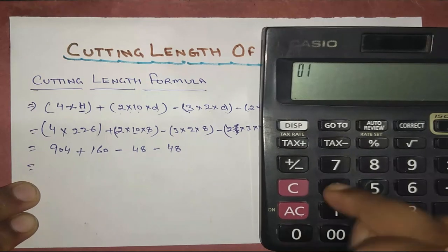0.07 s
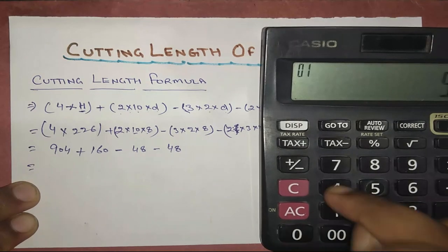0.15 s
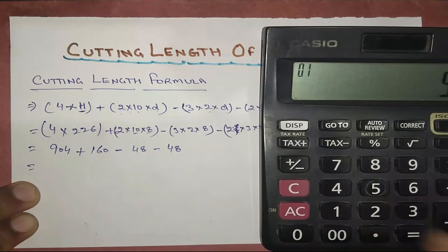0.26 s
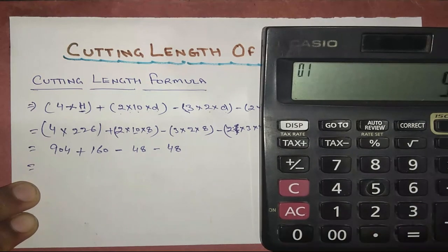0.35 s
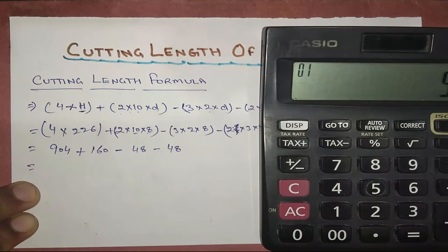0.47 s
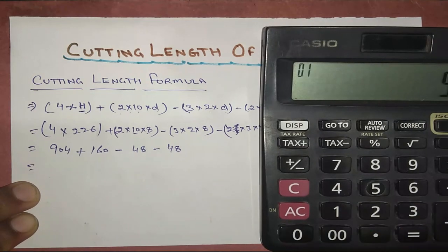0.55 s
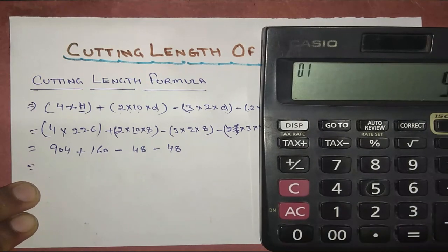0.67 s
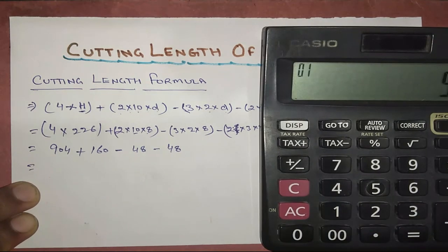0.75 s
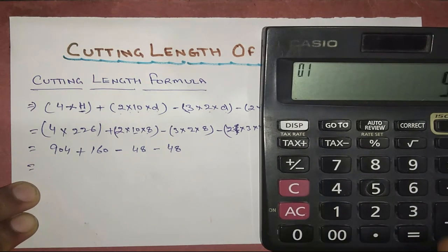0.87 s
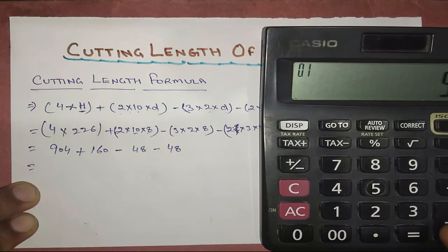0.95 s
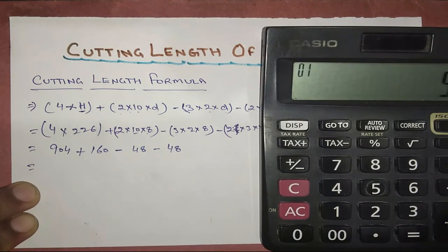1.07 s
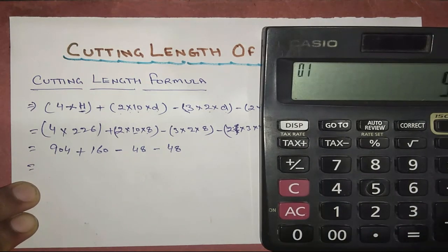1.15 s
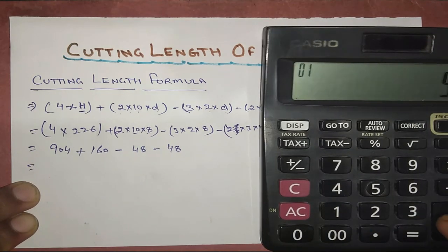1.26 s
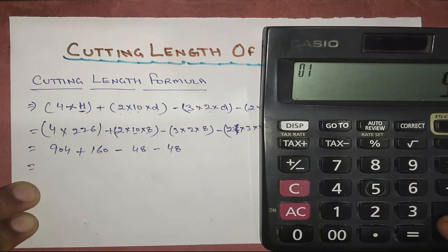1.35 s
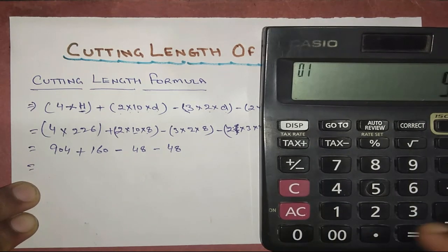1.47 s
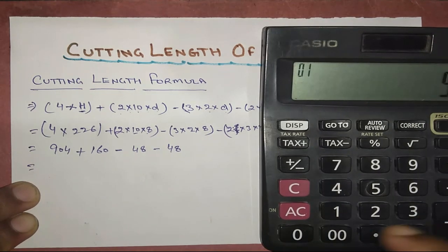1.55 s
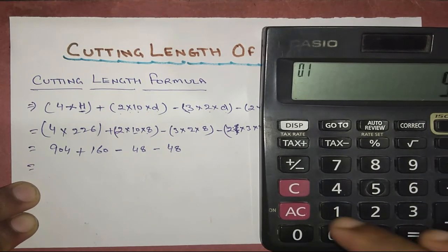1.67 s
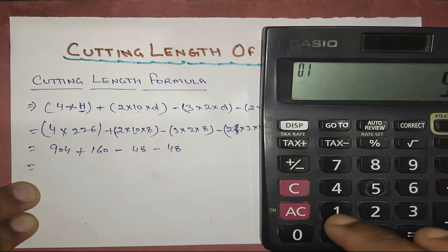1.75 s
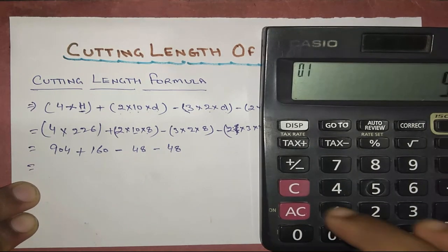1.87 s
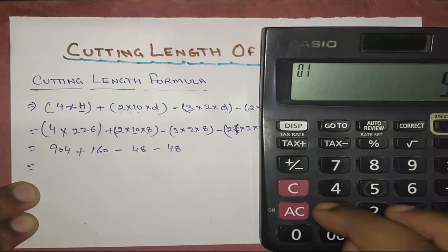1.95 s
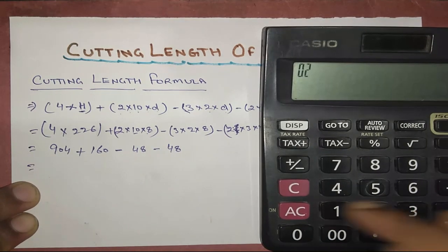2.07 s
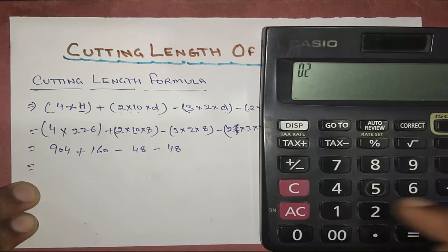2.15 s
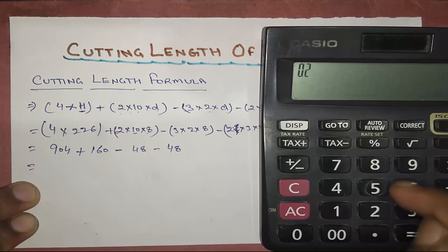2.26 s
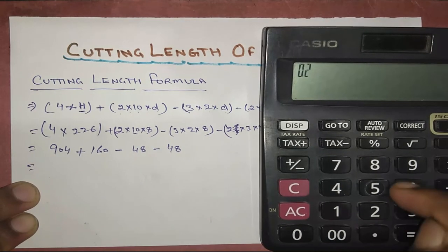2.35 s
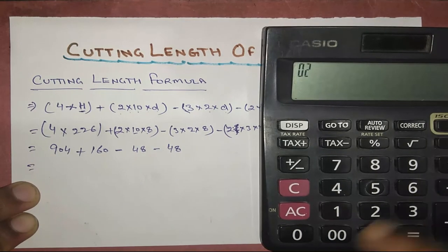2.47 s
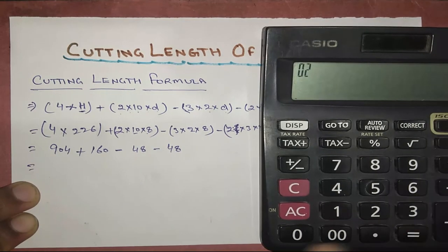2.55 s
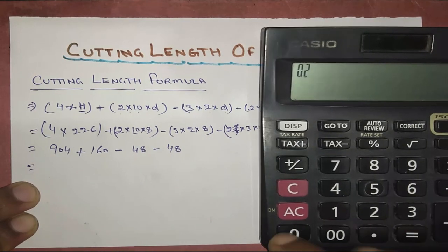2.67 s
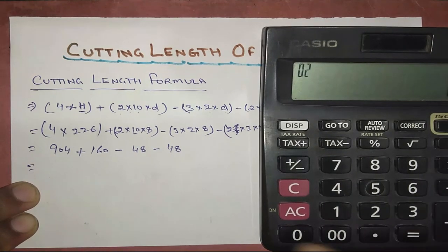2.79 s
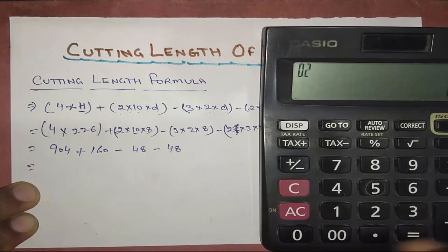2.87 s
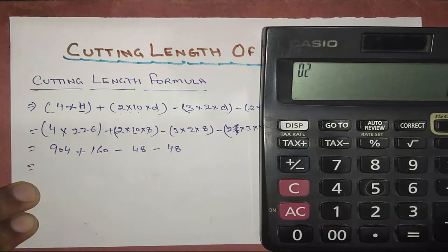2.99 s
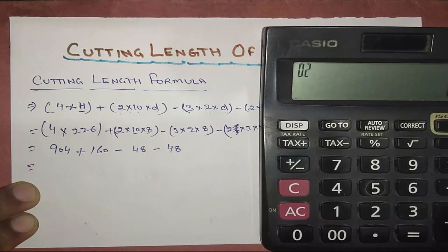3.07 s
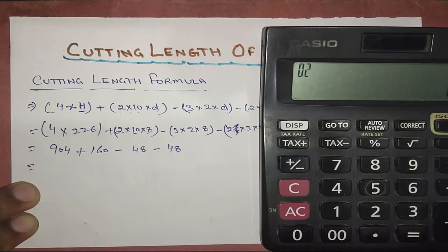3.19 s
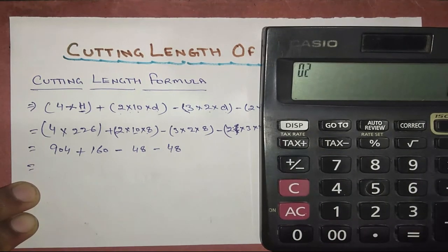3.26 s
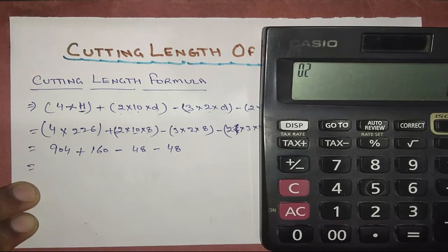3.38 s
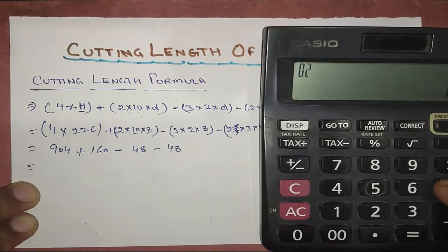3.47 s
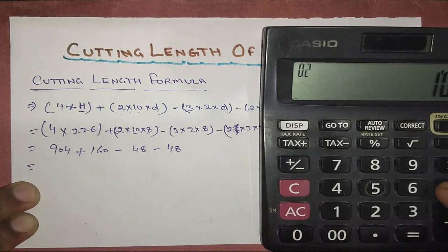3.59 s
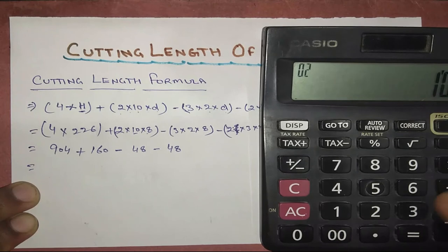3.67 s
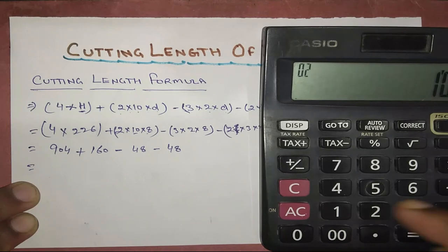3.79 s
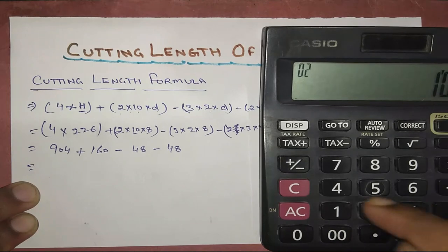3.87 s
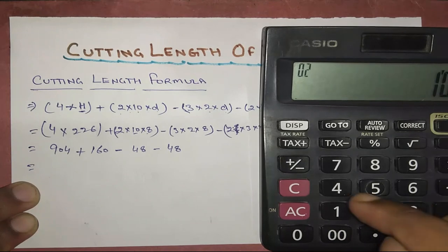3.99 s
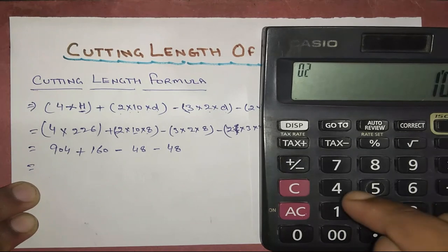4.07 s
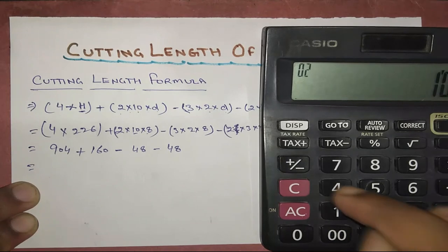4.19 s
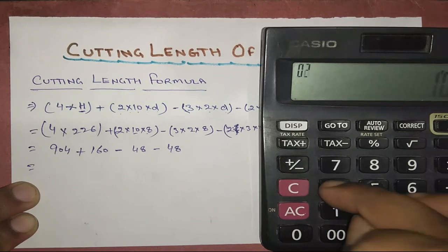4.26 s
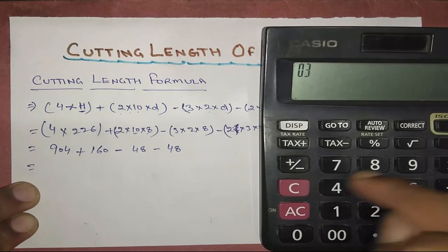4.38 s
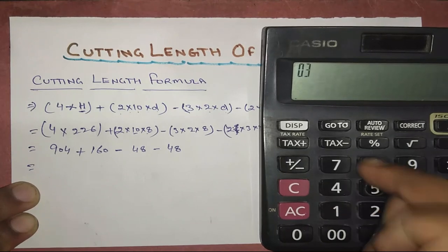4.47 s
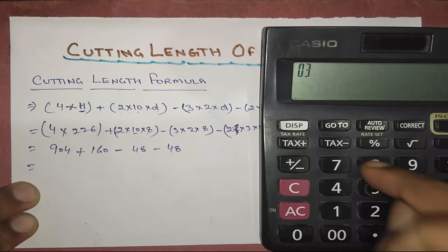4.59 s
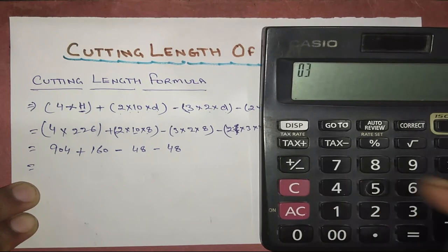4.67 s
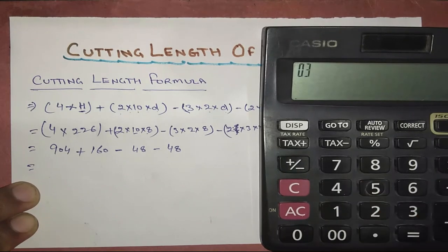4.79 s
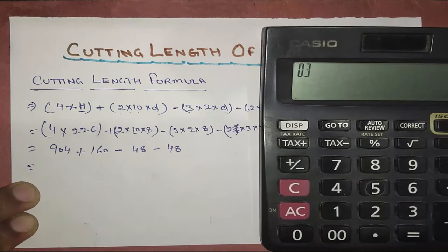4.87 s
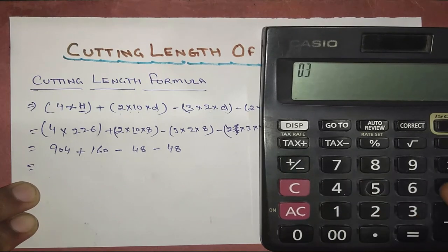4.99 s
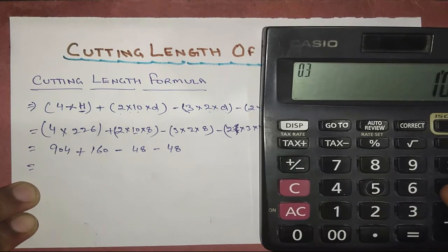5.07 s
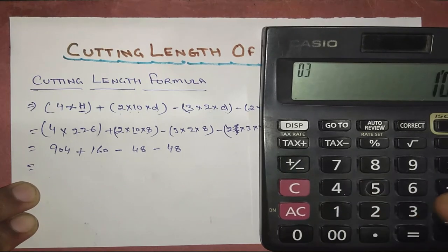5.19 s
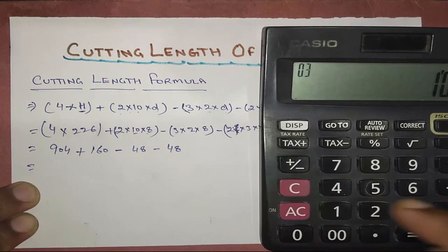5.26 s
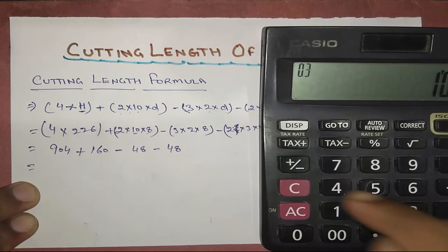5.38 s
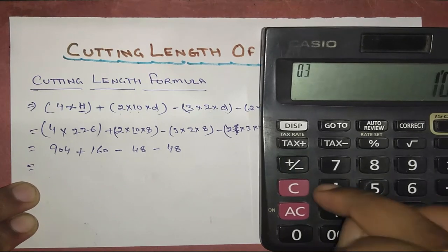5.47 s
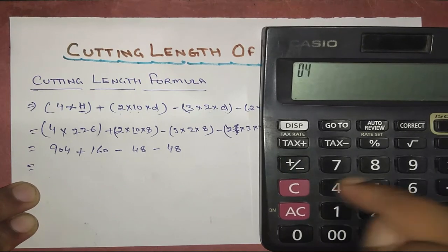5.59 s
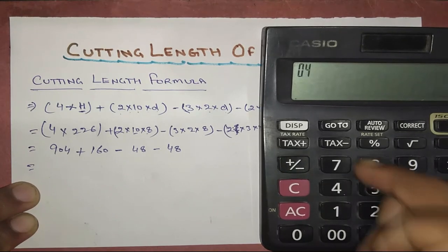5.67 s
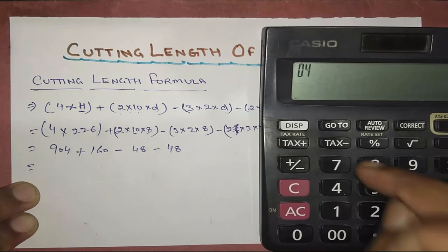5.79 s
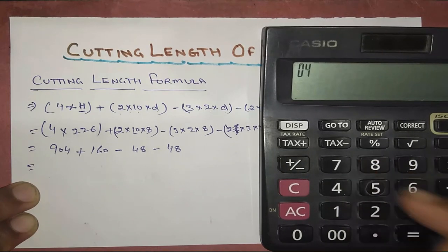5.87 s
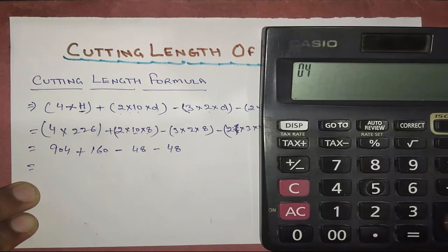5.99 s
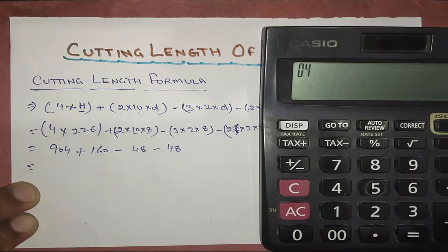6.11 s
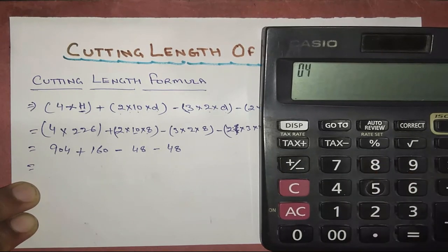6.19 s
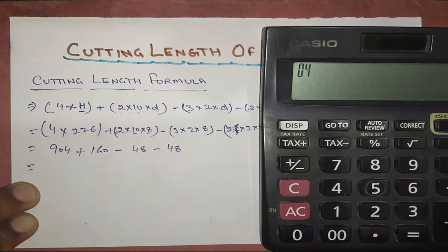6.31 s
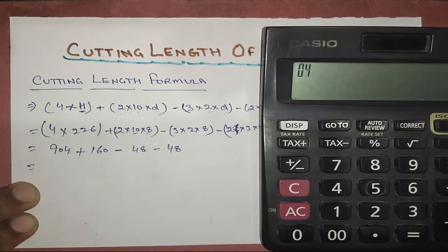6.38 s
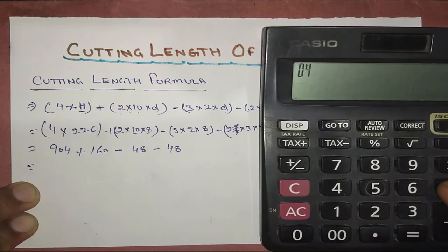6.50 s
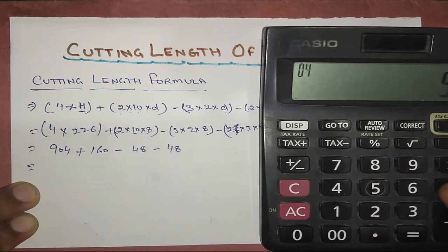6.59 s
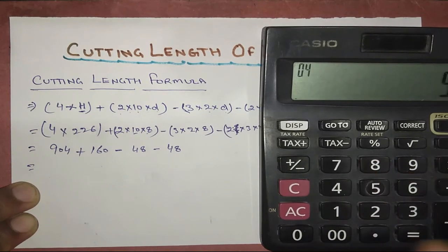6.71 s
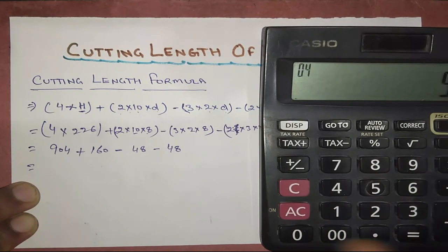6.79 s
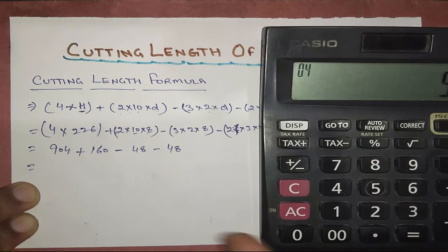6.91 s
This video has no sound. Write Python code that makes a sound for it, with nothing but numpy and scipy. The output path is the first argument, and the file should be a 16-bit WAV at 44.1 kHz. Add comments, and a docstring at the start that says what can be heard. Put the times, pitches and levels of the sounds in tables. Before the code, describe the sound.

The plastic keys of a desk calculator are pressed about a dozen times at an uneven pace. Each press gives a sharp, slightly hollow clack with a soft thud through the desk, followed at once by a second click as the key springs back. The microphone is close, in a small quiet room with a short echo. Faint engines and a low street rumble come through the walls, swelling and fading.

```python
"""Desk calculator in a small quiet room

Plastic keys are pressed and let go close to a phone's microphone. Each stroke is a cluster of contacts
that ring the case, and a press also thuds through the desk. Engines and street noise come through the
walls. The phone's noise suppressor shuts on the fading room tail."""
import sys
import numpy as np
from scipy import signal
from scipy.fft import rfft, irfft, next_fast_len
from scipy.io import wavfile
from scipy.ndimage import uniform_filter1d

SR = 44100
rng = np.random.default_rng(int(sys.argv[2]) if len(sys.argv) > 2 else 0)


def unload_wav(signal):
    """Save mono or channel-first audio to the path in sys.argv[1] as 16-bit WAV at rate SR, clipped to [-1, 1]."""
    wavfile.write(
        sys.argv[1],
        SR,
        np.round(np.clip(np.atleast_2d(signal).T, -1, 1) * 32767).astype(np.int16),
    )


N = 306039

# A key landing on its pad. Each row: time in seconds, rough peak in dB, low and high mode gains in dB,
# rattle decay in ms, lead of the finger's touch in ms, touch in dB, bounce spacing in ms, first bounce
# in dB, desk thud in dB.
PRESSES = [(0.1193, -5.5, -1, 3, 2.2, 3, -27, 5.2, -10, -21),
           (1.314, -2, -5, -15, 1, 2.5, -15, 5, -32, -32.5),
           (1.9633, -17.5, -2, -1, 1.2, 3.7, -26, 3.9, -16, -26),
           (2.326, -13.5, -1, -3, 6.3, 5.5, -19.5, 8.5, -15.5, -23),
           (2.678, -8, 0.5, 2.5, 1.9, 3.1, -31.5, 5.8, -13.5, -23.5),
           (3.4935, -6, -3, -2, 3, 2.6, -18.5, 5.8, -11, -20),
           (4.2706, -11, -5, -2.5, 1.1, 4.76, -16.5, 5.8, -31, -23.5),
           (4.5241, -9.5, -5.5, -5.5, .5, 5.6, -18.5, 5, -27.5, -25),
           (5.0146, -6.5, 0.5, -1.5, 2.4, 3.8, -19, 5.4, -10.5, -23.5),
           (5.4839, -10, -3, -1.5, 1.8, 3, -33, 12, -24, -30.5),
           (5.7249, -17.5, 2, 0, 1.6, 4.9, -21, 5, -32.5, -29),
           (6.572, -10, -0.5, -3.5, 1.3, 3, -33, 5, -11.5, -26.5)]


def contacts():
    """A press is a touch, a landing and three dying bounces; a release is pad, stop and cap edge."""
    # A key springing back to its stop. Each row: five columns as in PRESSES, lead of the pad letting go
    # in ms, its level in dB, lag of the cap's other edge in ms (minus is earlier), its level in dB.
    releases = [(0.2133, -14, -2.5, -2.5, 0.88, 18.7, -19.5, -20.5, -27),
                (1.4261, -15.5, 0.5, -3, .7, 8.5, -21.5, 9, -18.5),
                (2.0722, -15.5, -5.5, 0, 0.91, 18, -35, 10, -14.5),
                (2.4266, -9, -1, -3.5, 0.69, 18.8, -26.5, 7, -20),
                (2.775, -9, -2, 0, 1, 14.7, -26, 7.5, -15.5),
                (3.6266, -4.5, -4.5, -2, 1.6, 24, -20, -11.8, -16.5),
                (4.3669, -9.5, -3.5, 0, 1.1, 18.5, -27, -3.5, -16.5),
                (4.6263, -13, -2, -1, 1.4, 19.8, -18, 4.5, -34),
                (5.138, -1, -2.5, 6.5, 0.97, 23, -24.5, -6, -18.5),
                (5.5741, -13, -2.5, 2.5, .7, 19, -28, -6, -18.5),
                (5.825, -9, -3.5, 2.5, 1.16, 18.2, -25.5, -15, -32),
                (6.6647, -8, -3.5, -3, 3, 19, -18, 3.5, -15)]
    # Faint ticks, some alone, some just before a key springs back. Each row: four columns as in PRESSES.
    ticks = [(0.5886, -33, -18, -5.5), (0.6138, -38, -10, 2), (0.931, -34, -6, -1), (1.4913, -27.5, 9, -5),
             (2.7511, -27.5, -12, -4), (5.798, -33, 7.5, -5)]
    light_ms = 1.4  # rattle of a light contact
    hollow_db, bounce_low_db = 8, 1.5  # lift of the low modes
    rows = [(*tick, light_ms) for tick in ticks]
    for s, db, low, high, rattle_ms, touch_ms, touch_db, gap_ms, bounce_db, _ in PRESSES:
        rows.append((s - touch_ms / 1000, touch_db, low + hollow_db, high, light_ms))
        rows.append((s, db, low, high, rattle_ms))
        for k, jitter in enumerate(.06 * rng.standard_normal(3)):
            lag = gap_ms / 1000 * (k + 1 + k * jitter)
            rows.append((s + lag, bounce_db - 6 * k, low + bounce_low_db, high, light_ms))
    for s, db, low, high, rattle_ms, pad_ms, pad_db, edge_ms, edge_db in releases:
        rows += [(s - pad_ms / 1000, pad_db, low + hollow_db, high, light_ms),
                 (s, db, low, high, rattle_ms),
                 (s + edge_ms / 1000, edge_db, low + bounce_low_db, high, light_ms)]
    return rows


def keys():
    """Each contact slides, snaps and rattles, ringing the case: the close sound and the room's feed."""
    # Modes of the plastic case. Each row: pitch in Hz, width in Hz before broadening, level in dB.
    case_modes = [(490, 540, -10), (843, 440, -3), (1130, 150, -7), (1630, 420, -2.5), (1707, 190, -0.5),
                  (1982, 440, -2.5), (2940, 380, -3.5), (3374, 390, -1.5), (3840, 220, -2.5),
                  (4550, 280, -3.5), (5460, 350, -2.5), (6487, 420, -2), (6920, 510, -4), (6860, 560, 0),
                  (7710, 300, -5.5), (8900, 400, -13.5)]
    hz, width, mode_db = np.transpose(case_modes)
    near, around, t = np.zeros(N), np.zeros(N), np.arange(1280) / SR
    lead = 256  # samples ahead of the snap
    since, bins = t - lead / SR, np.fft.rfftfreq(lead, 1 / SR)
    decay = np.exp(-np.pi * 1.4 * np.outer(width, t))
    # the key stem scrapes in its guide just before it lands
    slide = undb(-19.5) * np.exp(np.minimum(since, 0) / 0.0021) * (since < 0)
    thin = signal.butter(4, 420, "high", fs=SR, output="sos")  # a small case radiates no bass
    # summed over all directions the mode weights even out into a smooth colour
    colour_db = along([(250, -41), *zip(hz, mode_db)], bins)
    for s, peak_db, low_db, high_db, rattle_ms in contacts():
        tilt = [(1800, low_db), (2800, 0), (4600, 0.012), (5600, high_db)]
        detune, scatter = rng.standard_normal((2, len(hz)))
        ring = decay * np.sin(2 * np.pi * np.outer(hz * (1 + detune / 25), t))
        weights = undb(mode_db + along(tilt, hz) + 1.8 * scatter) * (-1) ** np.arange(len(hz))
        rattle = np.exp(-np.maximum(since, 0) * 1000 / rattle_ms) * (since >= 0)
        push = rng.standard_normal(len(t)) * (slide + rattle)
        push[lead] += 3.0  # the snap
        hit = signal.sosfilt(thin, signal.fftconvolve(push, weights @ ring)[:len(t)])
        rough_peak = 2 * np.sqrt(np.max(uniform_filter1d(hit ** 2, size=90)))
        hit *= undb(peak_db) / rough_peak
        add(near, s - lead / SR, hit)
        even = np.fft.fftshift(irfft(undb(colour_db + along(tilt, bins))))
        add(around, s, even * np.linalg.norm(hit) / np.linalg.norm(even))
    return near, around


def thuds():
    """The soft push of a finger swells and fades in two desk modes that beat; the case knocks once."""
    # Desk modes, swinging against each other. Each row: pitch in Hz, level in dB.
    desk_modes = [(98.8, -3.5), (68.67, -5)]
    # The case knocking on the desk: pitch in Hz, t60 in seconds, level in dB against the thud.
    case_knock = (430, .05, -13)
    knock_hz, t60, knock_db = case_knock
    swell_s, lag_s = 0.024, .004
    out, t = np.zeros(N), np.arange(SR // 4) / SR
    swell = t / swell_s * np.exp(1 - t / swell_s)
    ring = sum((-1) ** k * undb(db) * np.sin(2 * np.pi * hz * t) for k, (hz, db) in enumerate(desk_modes))
    for s, *_, db in PRESSES:
        hz = knock_hz * (1 + 0.028 * rng.standard_normal())
        knock = np.sin(2 * np.pi * hz * t) * 1000 ** (-t / t60)
        add(out, s + lag_s, undb(db) * (swell * ring + undb(knock_db) * knock))
    return out


def room(x):
    """Dense early clatter from desk and case, then a tail that decays band by band."""
    # Decay of the small room. Each row: frequency in Hz, t60 in seconds.
    decay_times = [(300, 0.46), (1000, 0.49), (3000, 0.29), (8000, 0.33)]
    tail_db, early_db, early_s = -15.5, -12, 0.0084
    t, tail = np.arange(int(.7 * SR)) / SR, 0
    for hz in 250 * 2. ** np.arange(6):
        octave = band_noise(hz / np.sqrt(2), hz * np.sqrt(2), len(t))
        tail = tail + octave * 1000 ** (-t / along(decay_times, hz))
    tail *= 1 - np.exp(-t / 0.0012)
    early = rng.standard_normal(len(t)) * np.exp(-t / early_s) * (1 - np.exp(-t / .001))
    echo = undb(tail_db) * tail / np.linalg.norm(tail) + undb(early_db) * early / np.linalg.norm(early)
    return signal.fftconvolve(x, echo)[:N]


def engine(curve, partials, flutter_db=1.66):
    """Engine orders as wavering tones: (ratio, dB) partials follow an (s, Hz, dB) curve."""
    s, hz, db = np.transpose(curve)
    t = np.arange(N) / SR
    pitch = np.interp(t, s, hz) * (1 + .006 * walk(25))
    phase = 2 * np.pi * np.cumsum(pitch) / SR
    level_db = np.interp(t, s, db)
    fade = np.clip(np.minimum(t - s[0], s[-1] - t) / 0.062, 0, 1)
    return fade * sum(np.sqrt(2) * undb(level_db + gain_db + flutter_db * walk(11)) * np.sin(k * phase)
                      for k, gain_db in partials)


def engines():
    """Four engines outside: one recedes, one runs far off, one pulls through gears, one revs."""
    # The receding engine. Each row: time in seconds, firing rate in Hz, level in dB.
    receding = [(0.0, 52.6, -51.5), (0.1, 52.33, -39), (0.22, 53.16, -36.5), (0.41, 51.47, -36.5),
                (1.166, 54, -42), (1.4, 56.7, -56.5)]
    # Its tones. Each row: order, gain in dB.
    receding_orders = [(1, -14), (2, -5), (4, -0.5)]
    # The far, steady engine. Each row: time in seconds, fifth order in Hz, level in dB.
    far = [(2.5, 256, -56.5), (3.2, 259, -52.5), (4.6, 270, -61)]
    # Three pulls: one gear, the next, and again late. Each row: time in seconds, third order in Hz,
    # level in dB.
    pulls = [
        [(2.1, 151.3, -47), (2.56, 138.8, -44), (3.3, 140, -42), (3.6, 141.1, -41), (3.92, 147.8, -41.5),
         (4.02, 162, -37.5)],
        [(4.02, 127.8, -45), (4.09, 131.5, -38), (4.61, 142.4, -35.5), (4.7, 142, -48), (4.95, 140.5, -39)],
        [(6.35, 123, -50), (6.56, 128.5, -44), (6.94, 128.3, -41.5)],
    ]
    # Fourth order of each pull, in dB against the third.
    fourths_db = [-4, -16, -6.5]
    # Three revs. Each row: start, loudest point and end in seconds, third order in Hz at each of these,
    # loudest level in dB, sixth order in dB against the third.
    revs = [(.65, .8, 1.42, 181, 184, 180.5, -42, -16.5), (1.59, 1.901, 2.15, 178, 185.2, 181, -42, -14.5),
            (3.92, 4.122, 4.4, 168, 185, 203, -33.5, -17)]
    rise_db, fall_db = 8.5, 6.5
    drone = engine(receding, receding_orders) + engine(far, [(1, 0), (6 / 5, -9.5)])
    drone += sum(engine(pull, [(1, 0), (4 / 3, db)]) for pull, db in zip(pulls, fourths_db))
    for *times, from_hz, mid_hz, to_hz, db, sixth_db in revs:
        curve = np.transpose([times, (from_hz, mid_hz, to_hz), (db - rise_db, db, db - fall_db)])
        drone += engine(curve, [(1, 0), (2, sixth_db)])
    return drone


def street():
    """Drone, rumble and patchy tyre roar, heard through the walls."""
    # Levels of the background; drone and roar fade away. Each row: time in seconds, then rumble, drone
    # and roar in dB.
    levels = [(0.0, -36, -40, -43), (0.691, -42, -46, -46.5), (1.04, -42.5, -50, -53),
              (1.39, -45.5, -49.5, -50), (1.7, -42.5, -56.5, -61.5), (2.4, -40, -55, -67.5),
              (2.74, -40, -48.5, -55), (3.0, -41.5, -61, -65.5), (3.46, -40, -55.5, -63.5),
              (3.8, -43.5, -55, -59.5), (4.05, -41.5, -58, -63), (4.55, -38.5, -43, -56.5),
              (4.78, -39, -68, -64), (5.12, -42.5, -69, -63.5), (5.35, -52, -76.5, -79),
              (5.651, -46, -66, -64), (5.999, -46, -73.5, -77), (6.5, -43, -72.5, -70.5),
              (6.94, -36, -69.5, -65)]
    # The colours of the three. Each row: frequency in Hz, relative level in dB.
    drone_colour = [(200, -28.5), (270, 1), (380, -8.5), (520, -16), (700, -27.5)]
    rumble_colour = [(25, -29), (48, -6.5), (110, -1.5), (150, -3), (210, -4.5), (270, -17.5), (340, -57)]
    roar_colour = [(550, -22.5), (750, -7), (1030, -2), (1350, -5.5), (1700, -8.5), (2100, -11.5),
                   (2700, -26.5), (3500, -47.5)]
    s, rumble_db, drone_db, roar_db = np.transpose(levels)
    drone = wash(drone_colour, (s, drone_db), flicker_db=3.0, rate_hz=9., bands=8)
    rumble = wash(rumble_colour, (s, rumble_db), flicker_db=2.1, rate_hz=8.2, bands=6)
    roar = wash(roar_colour, (s, roar_db), flicker_db=5.5, rate_hz=5.4, bands=26)
    return drone + rumble + roar


def hiss():
    """Broad hiss, loud at first, then sinking to a faint floor."""
    # Its colour. Each row: frequency in Hz, relative level in dB.
    colour = [(350, -17), (900, 0), (3000, 1), (6000, -4.5), (8000, -4.5)]
    # Its course. Each row: time in seconds, level in dB.
    levels = [(0, -35.5), (.1, -52.5), (.35, -55), (.5, -71), (1.299, -75), (6.6, -74.5), (6.94, -61)]
    return wash(colour, np.transpose(levels), flicker_db=0.85, rate_hz=18.0, bands=4)


def narrow_hisses():
    """Faint narrow hisses that come and go."""
    # Each row: start and length in seconds, centre and width in Hz, top level in dB.
    bursts = [(0.487, 0.26, 5400, 890, -60), (0.853, 0.09, 6900, 810, -65), (0.92, 0.18, 3565, 490, -68.5),
              (0.914, 0.11, 7100, 1210, -61), (1.185, 0.18, 1110, 148, -44.5),
              (1.202, 0.18, 4400, 297, -59.5), (1.206, 0.17, 3340, 496, -57.5),
              (4.655, 0.19, 4650, 402, -56.5), (6.2, 0.24, 752, 148, -67.5), (6.792, 0.19, 4420, 1520, -54),
              (6.79, 0.23, 1520, 300, -57.5)]
    out = np.zeros(N)
    for s, length, hz, width, db in bursts:
        swell = np.sin(np.pi * np.linspace(0, 1, int(length * SR)) ** 0.47)
        add(out, s, undb(db) * swell * unit(band_noise(hz - width / 2, hz + width / 2, len(swell))))
    return out


def wash(colour, curve, flicker_db, rate_hz, bands):
    """Noise of one colour on a level curve; each band flickers on its own."""
    size = next_fast_len(N, real=True)
    hz, out = np.fft.rfftfreq(size, 1 / SR), 0
    noise = rfft(rng.standard_normal(size)) * undb(along(colour, hz))
    low_hz, high_hz = colour[0][0], colour[-1][0]
    step = np.log(high_hz / low_hz) / (bands - 1)
    for mid in np.geomspace(low_hz, high_hz, num=bands):
        share = np.exp(-2 * (np.log((hz + 1) / mid) / step) ** 2)
        out = out + undb(flicker_db * walk(rate_hz)) * irfft(noise * share, size)[:N]
    return unit(out) * undb(np.interp(np.arange(N) / SR, *curve))


def band_noise(low_hz, high_hz, samples):
    """White noise through a band-pass."""
    band = signal.butter(2, [low_hz, high_hz], "band", fs=SR, output="sos")
    return signal.sosfilt(band, rng.standard_normal(samples))


def walk(rate_hz):
    """Random levels held 1 / rate_hz seconds and smoothed twice; rms 1."""
    hold = int(SR / rate_hz)
    steps = np.repeat(rng.standard_normal(N // hold + 1), hold)
    return unit(uniform_filter1d(uniform_filter1d(steps, hold), hold)[:N])


def along(points, hz):
    """Value of (Hz, value) points on a log-frequency axis."""
    point_hz, values = np.transpose(points)
    return np.interp(np.log(hz + 1), np.log(point_hz), values)


def undb(db):
    """Decibels to gain."""
    return 10 ** (np.asarray(db) / 20)


def unit(x):
    """Scaled to rms 1."""
    return x / np.sqrt(np.mean(x ** 2))


def add(out, s, x):
    """Mixes x in at s seconds."""
    i = int(s * SR)
    out[i:i + len(x)] += x[:N - i]


def scene():
    """One microphone close to the keys, with the room around it and the street outside."""
    near, around = keys()
    return (near + room(around) + thuds() + engines() + street() + hiss() + narrow_hisses())[None]


def suppress(x, floor_db=-18, hold=0.38):
    """The phone's noise suppressor turns down bins whose recent power sinks under its threshold."""
    # Each row: frequency in Hz, threshold in dB per bin.
    threshold = [(200, -140), (400, -89.5), (1000, -83), (2500, -89), (8000, -102)]
    hz, _, spectra = signal.stft(x, SR, nperseg=1024, noverlap=768)
    power = np.abs(uniform_filter1d(np.abs(spectra) ** 2, size=5, axis=0))
    power = np.maximum(power, signal.lfilter([1 - hold], [1, -hold], power, axis=1))
    over = np.sqrt(power) / undb(along(threshold, hz))[:, None]
    gain = np.clip(over ** 2, undb(floor_db), 1)
    return signal.istft(spectra * gain, SR, nperseg=1024, noverlap=768)[1][:N]


def record(dry):
    """The phone: suppressor, voice-band edge with a faint image above, self-noise, clipping, steep top."""
    # Raising the low sampling rate mirrors the band around half that rate.
    # Each row: frequency in Hz, gain of the image in dB.
    image_gain = [(8000, -20.5), (8600, -33), (9300, -42.5), (10500, -34.5), (12000, -43), (13000, -49),
                  (15300, -48.5), (15800, -90)]
    edge_hz, voice_rate_hz, top_hz, self_noise_db = 7700, 16000, 16300, -86.5
    voice = signal.sosfilt(signal.cheby1(12, .5, edge_hz, fs=SR, output="sos"), suppress(dry[0]))
    size = next_fast_len(N, real=True)
    mirrored = rfft(2 * voice * np.cos(2 * np.pi * voice_rate_hz * np.arange(N) / SR), size)
    image = irfft(mirrored * undb(along(image_gain, np.fft.rfftfreq(size, 1 / SR))), size)[:N]
    clipped = np.clip(voice + image + undb(self_noise_db) * rng.standard_normal(N), -.88, .88)
    return signal.sosfilt(signal.ellip(8, .2, 60, top_hz, fs=SR, output="sos"), clipped)[None]


dry = scene()
out = record(dry)
unload_wav(out)
```